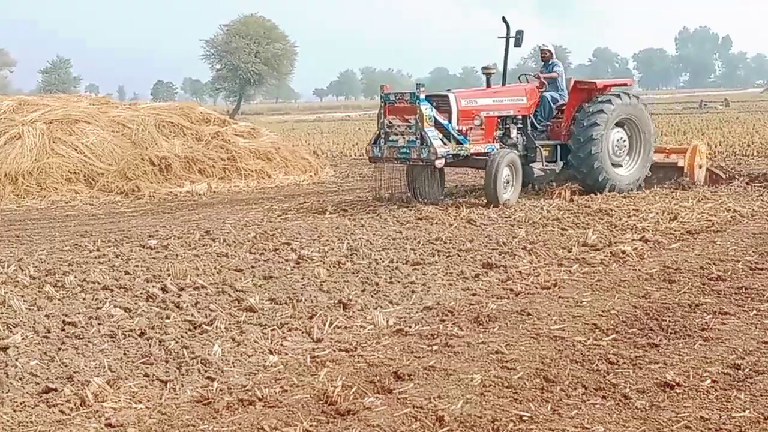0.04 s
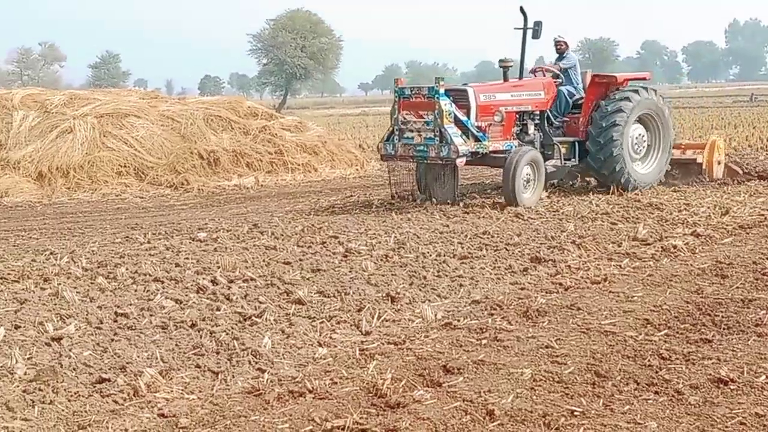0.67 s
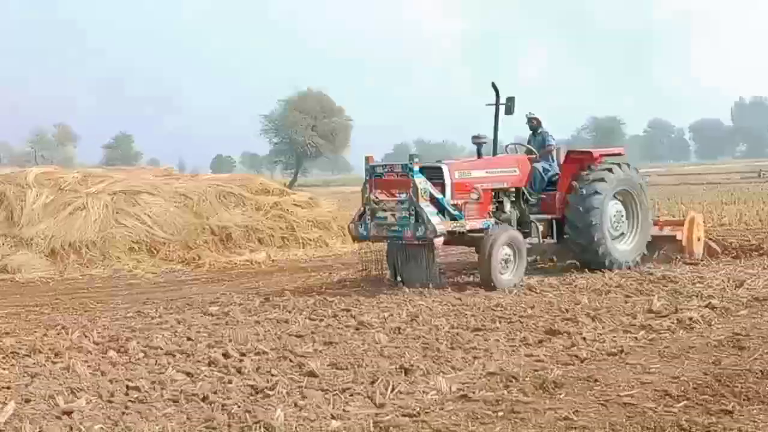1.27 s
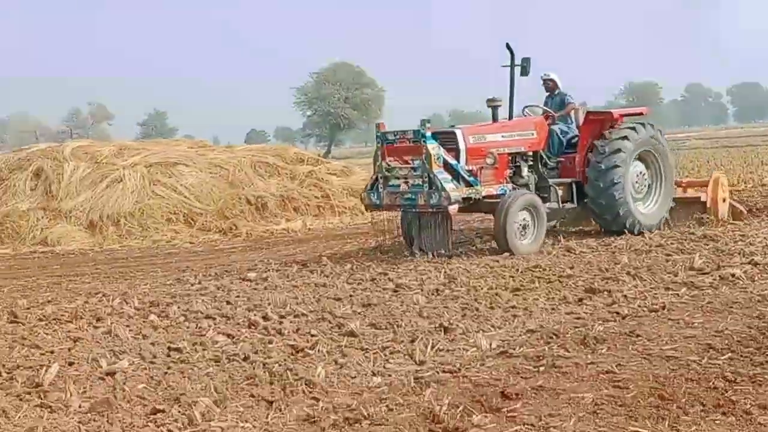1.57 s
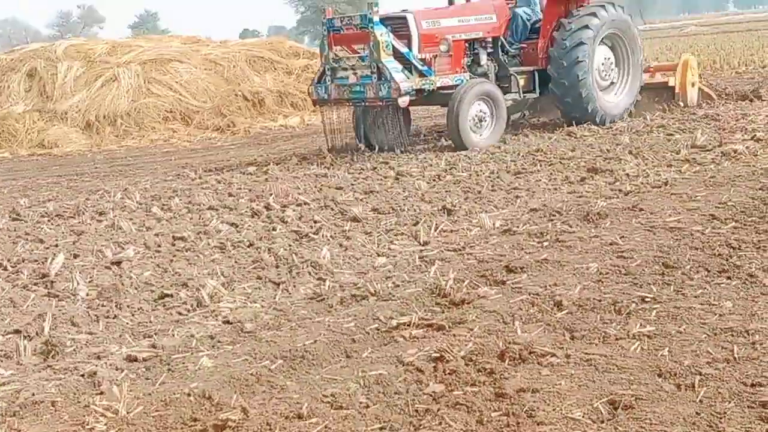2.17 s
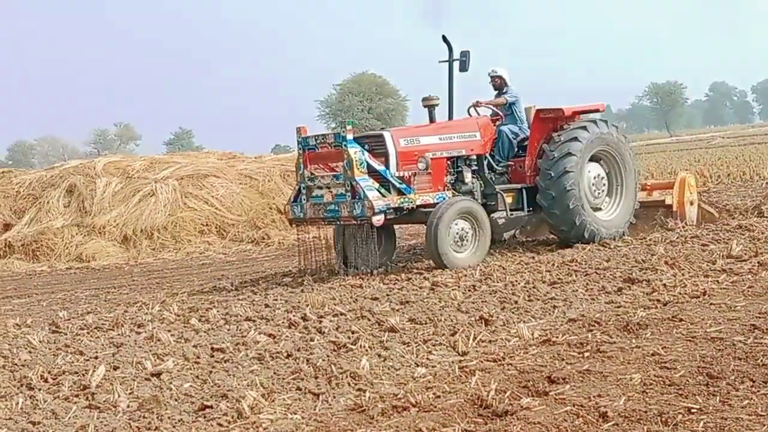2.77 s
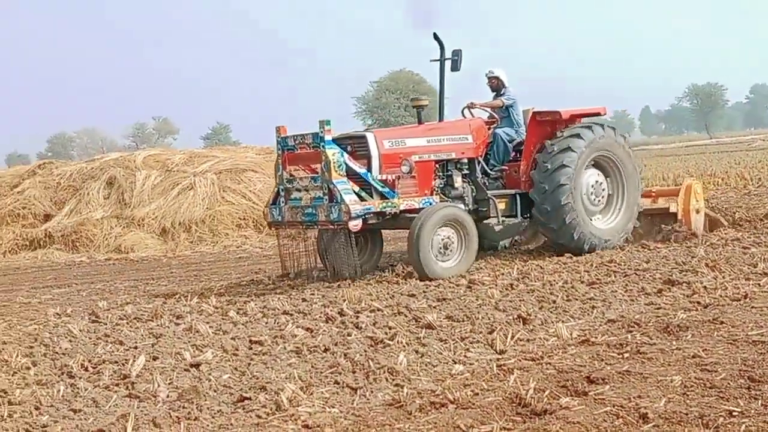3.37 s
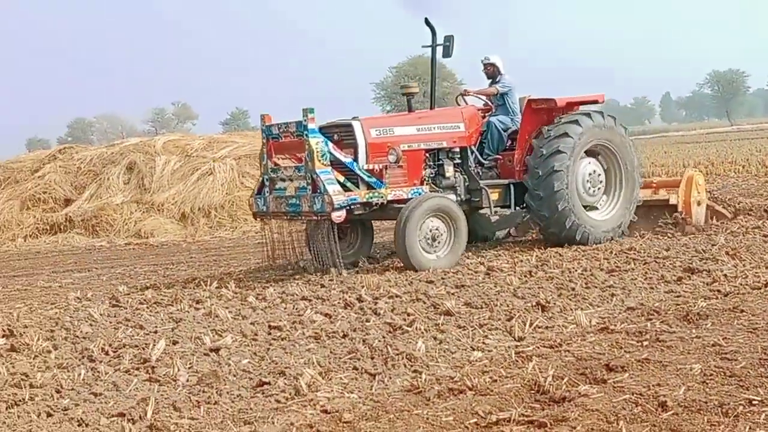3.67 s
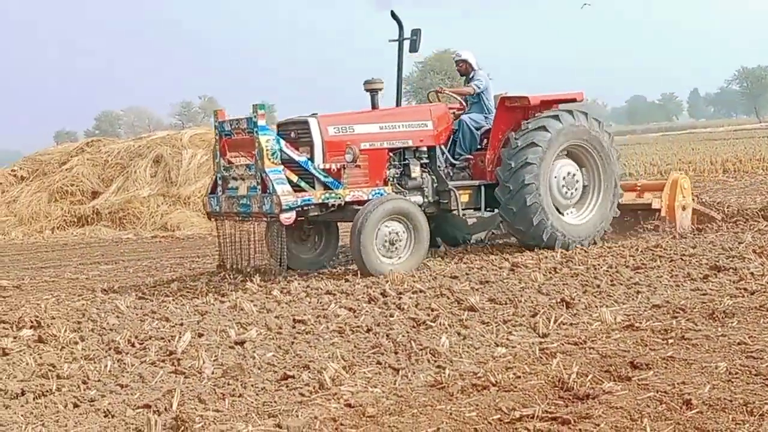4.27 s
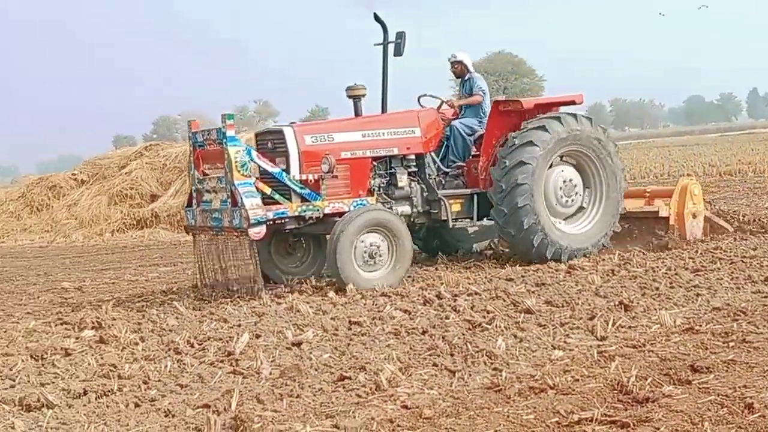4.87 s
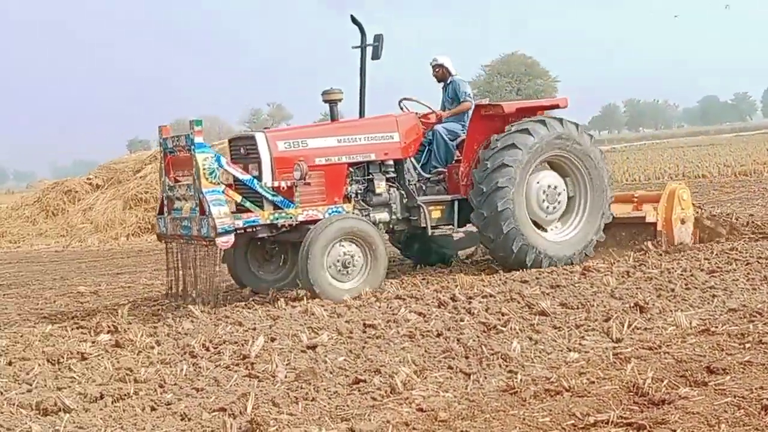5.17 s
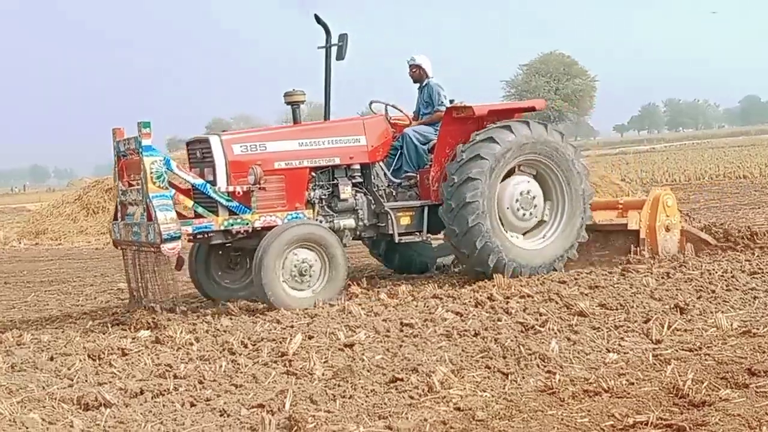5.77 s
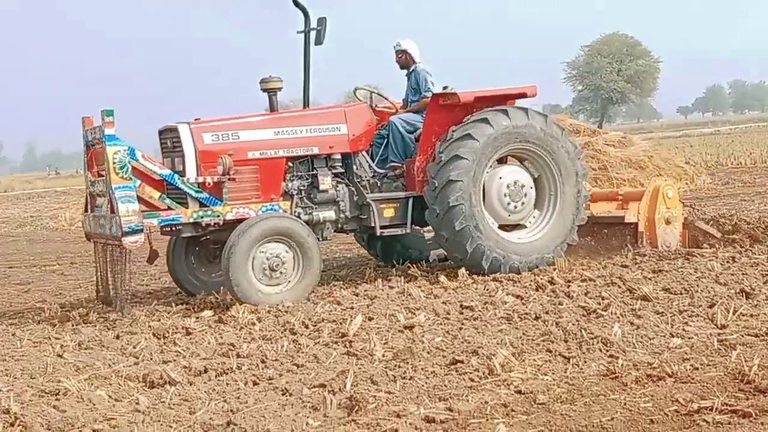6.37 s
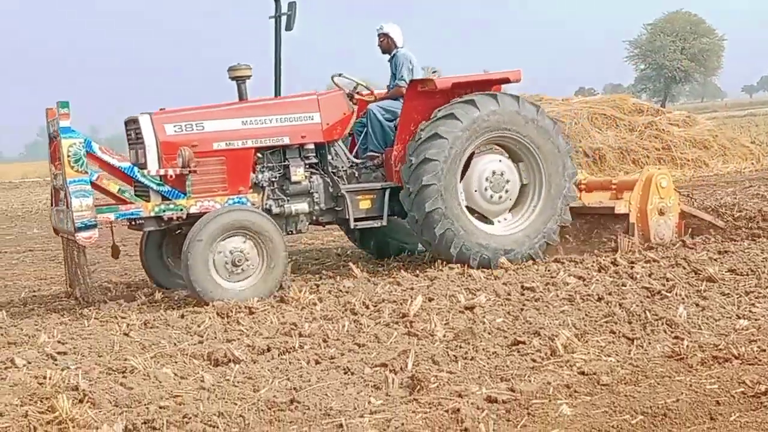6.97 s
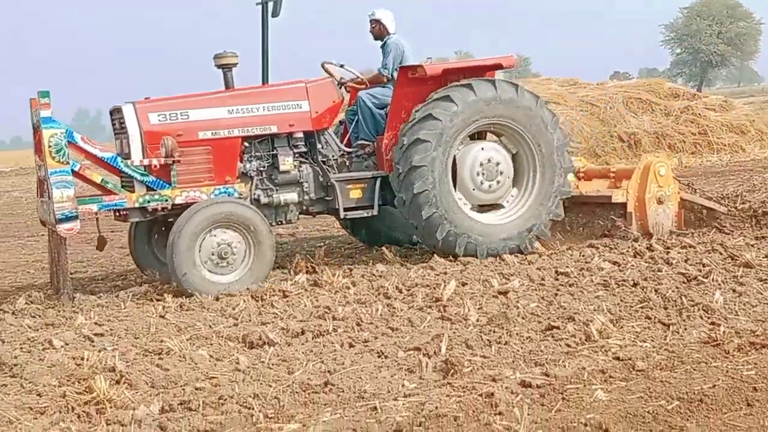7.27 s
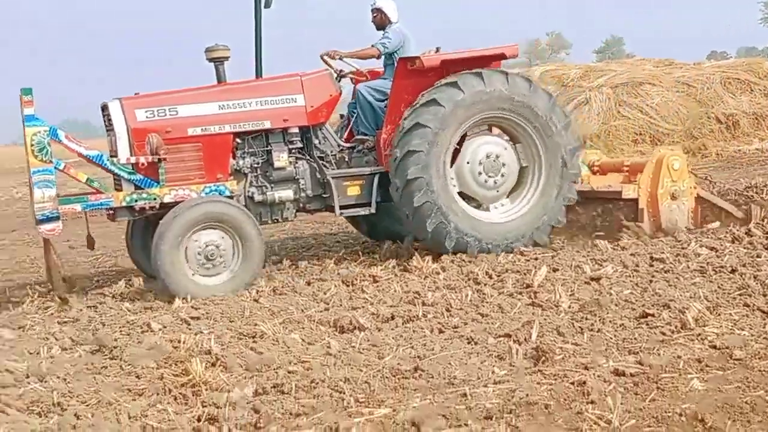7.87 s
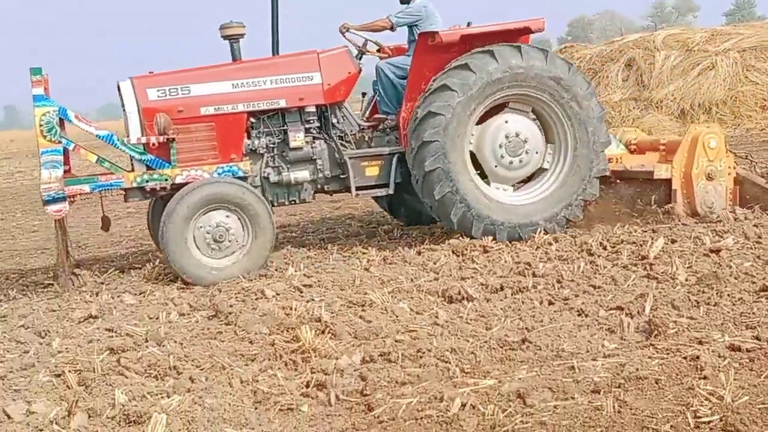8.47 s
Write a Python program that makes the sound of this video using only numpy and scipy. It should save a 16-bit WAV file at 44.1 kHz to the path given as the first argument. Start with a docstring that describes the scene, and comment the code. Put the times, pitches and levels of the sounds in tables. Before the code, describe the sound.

A diesel tractor pulls a rotary tiller across an open field for about eight and a half seconds, slowly nearing the microphone. From the start there is a continuous low exhaust drone with rapid knocking, clatter, fine metallic ticking and a light whirr; the pitch wavers slightly under load. Crumbling soil hisses softly underneath, swelling briefly between 1 and 2 seconds. Dry stalks crack at around 0.7, 1.3 and 2.1 seconds, and very faint, thin chain clinks occur between 2 and 5 seconds. Gear whine comes and goes, strongest from 5.5 to 6.6 seconds and again from 7.3 to 8.2. A vibrating metal panel adds a faint steady tone from about 1 second, clearest around 5, and returns near 7.3. The exhaust grows louder and fuller through the second half, and the engine is still running close by at the end.

```python
"""A four-cylinder diesel tractor pulls a rotary tiller over a dry field, nose on, then side on.
Exhaust drone, block knock, injector ticks and gear whine are locked to the crankshaft.
Soil hisses under the blades, stalks crack, a shaken panel howls and chain links clink.
The ground bounce hollows the sound; echoes off clods and wheels ripple the treble."""
import sys
import numpy as np
from scipy import signal
from scipy.fft import rfft, irfft, next_fast_len
from scipy.io import wavfile
from scipy.ndimage import uniform_filter1d, map_coordinates

SR = 44100
rng = np.random.default_rng(int(sys.argv[2]) if len(sys.argv) > 2 else 0)


def transcribe(u):
    """Save the signal u as a 16-bit wav file named by the first command-line argument.

    u: samples, shape (n,) or (channels, n), limited to [-1, 1]; the rate is SR.
    q: integer samples, one column per channel.
    """
    v = np.clip(np.atleast_2d(u).T, -1, 1)
    q = np.round(v * 32767).astype(np.int16)
    wavfile.write(sys.argv[1], SR, q)


N = 380583
T = np.arange(N) / SR
FFT_SIZE = next_fast_len(N + 8192)
BINS_HZ = np.fft.rfftfreq(FFT_SIZE, 1 / SR)

# engine speed, sagging with load: t/s, firing rate/Hz
FIRING_RATE = [(0.0, 47.69), (1.13, 47.61), (1.64, 48.41), (2.44, 47.43), (2.86, 48.12), (3.47, 46.18),
               (4.71, 47.18), (5.07, 48.45), (5.83, 46.27), (6.06, 47.01), (6.79, 46.32), (7.52, 48.24),
               (8.03, 48.49), (8.4, 46.69), (8.63, 45.19)]
# flank in view: t/s, share (0-1)
SIDE_ON = [(0, 0.11), (1.1, 0.08), (2.3, 0.5), (2.9, 0.79), (5.5, 1)]
# per part: level far and nose on/dB, gain side on/dB, gain when closest/dB
LEVELS = {"hum": (-31, 2.1, .3), "puffs": (-35.5, -2.95, 13.6), "knock": (-24.5, -2.88, 6.66),
          "clatter": (-26, 0.74, -1.17), "ticks": (-35.5, -2, -1.7), "soil": (-40.5, -5, 7.9),
          "dust": (-51.5, -13.5, 4.6), "whirr": (-27.5, -6, -1.7)}
# shaft-locked lines: multiple of firing rate, relative level/dB
EXHAUST_LINES = [(3, -1.5), (4, -3), (5, -1.5), (5.5, -7), (6, -5.5), (6.5, -1.5)]
WHIRR_LINES = [(19, -10.5), (20, -14.5)]
WHINE_LINES = [(13, -17), (16, 2), (24, -15.5), (32, -12), (34, -15.5)]
# source spectra: f/Hz, relative level/dB
PIPE_NOSE = [(52, -42), (68, -6), (90, -6), (135, 3), (175, -2), (235, -6), (320, 1.5), (400, 0), (520, -2),
             (700, -25), (1200, -61)]
PIPE_FLANK = [(52, -45), (68, -10.5), (90, -6), (135, -1), (195, -1.5), (250, 1), (320, -0.5), (420, -5),
              (520, -8), (700, -23), (1200, -64)]
BLOCK_NOSE = [(300, -15), (500, -12.5), (650, -1.5), (760, 1.5), (920, -1.5), (1150, 4), (1400, 0.5),
              (2000, -38), (4000, -80)]
BLOCK_FLANK = [(300, -40), (480, -3), (620, 0), (760, 5), (900, -1), (1020, -3.5), (1200, -5.5), (1500, -7),
               (2200, -60), (4000, -75)]
GEARS_NOSE = [(800, 5.5), (1300, -14.5), (1650, -2), (1900, -1), (2150, -7), (2400, -2), (2700, -5),
              (3050, -5), (3600, -10), (4300, -19.5), (7000, -56)]
GEARS_FLANK = [(800, -41), (1120, -3), (1350, -3.5), (1550, 3.5), (1750, 2), (2000, -1), (2200, -1),
               (2450, -6.5), (2800, -5.5), (3150, -8.5), (3420, -17.5), (7000, -44)]
INJECTORS = [(2000, -43), (3500, -13), (4400, -4.5), (5100, -15.5), (5800, -10.5), (6700, -3.5),
             (7500, -3.5), (8000, -9.5), (8600, -14.5), (9300, -41)]
COVER_TAPS = [(1200, -37), (1900, 10.5), (7800, -7), (9000, -29.5)]
SOIL_NOSE = [(1000, -18.5), (3400, -3), (4200, -1.5), (5100, -4), (6000, -10.5), (7000, -1), (8300, -6),
             (8800, -11), (9400, -41)]
SOIL_FLANK = [(1000, -11.5), (3300, -5.5), (3700, -0.5), (4250, -5), (5000, 1.5), (5400, -1), (5900, -2.5),
              (6500, 0), (7600, -1.5), (8200, -10), (8800, -14.5), (9400, -47)]
DUST_NOSE = [(6000, -8), (9000, -4), (11000, -6), (13000, 0), (14000, -6), (15500, -2)]
DUST_FLANK = [(6000, -14), (9000, 5.5), (9500, -5), (10900, 1.5), (11400, -3), (12500, -3.5), (13300, -12),
              (13900, -21), (15500, -21.5)]
AIR = [(10, -18), (35, -11), (62, 0), (120, -5)]
STRAW = [(3000, -25), (7000, 16), (9500, 3), (12500, 0), (15500, -8)]
# cover and fuel-pipe modes: f/Hz, width/Hz, relative level/dB
COVER_MODES = [(2128, 15, 8.5), (2625, 54, 0.5), (5140, 200, 0.5), (6850, 64, -12), (7050, 49, -5),
               (7570, 57, -12.5), (7880, 35, -3.5)]
# peak in the tick spectrum: t/s, f/Hz
TICK_PEAK = [(0, 8340), (1.1, 7700), (2.3, 7700), (2.8, 7100), (3.4, 6940), (4.0, 7700), (5.0, 7200),
             (8.63, 7230)]
# swells and dips of ticks and soil hiss: t/s, length/s, gain/dB
TICK_FLARES = [(.45, 1.4, 1), (1.8, 0.58, 4), (3.05, 0.15, 2.5), (3.35, 0.2, -2), (3.84, 0.3, 3.5),
               (7.4, .6, -3), (8.35, .2, 2)]
HISS_SWELLS = [(1.15, .6, 5.5), (2.5, 1, -3.5)]
# spells of gear whine and panel howl: t/s, length/s, level/dB
BLADE_BITES = [(.05, 0.84, -31), (1.05, 0.53, -26), (1.7, 1.12, -30.5), (4.5, 1.3, -30), (5.45, 1.19, -22),
               (7.25, 0.89, -20), (8.15, .45, -25)]
PANEL_HOWLS = [(1.1, 3.8, -32), (4.55, 0.92, -26.5), (7.25, 0.96, -31)]
# stalks cracking: t/s, level/dB
STALK_CRACKS = [(.615, -38), (.692, -29), (.706, -39), (1.305, -41), (2.11, -38)]
# chain links touching: t/s, level/dB, f/Hz
CLINKS = [(1.84, -45, 12400), (1.92, -46, 12550), (2.12, -53, 13000), (2.87, -53, 10180),
          (3.64, -53, 10000), (4.09, -54, 12600), (5.0, -55, 10040)]
# lowest ground-bounce dip: t/s, f/Hz
GROUND_DIP = [(0, 560), (1.1, 566), (1.5, 496), (2.3, 462), (3.4, 427), (8.63, 436)]
# bounce bands: multiple of dip nose on, same side on, width/Hz, gain nose on/dB, gain side on/dB
GROUND_BANDS = [(1.0, 1.0, 85, -15, -8.5), (2.3, 3.15, 130, -15.5, 1), (2.9, 3.75, 233, 7.5, 0.5),
                (4.7, 4.3, 120, -7.5, -8.5)]
# brief midrange hollows and crests: t/s, length/s, f/Hz, gain/dB
BRIEF_BANDS = [(1.25, 0.34, 1940, -11), (1.6, 0.55, 1960, 7.5), (1.65, 0.59, 1540, -6.5)]
# wandering treble crest: t/s, f/Hz, gain/dB
TREBLE_CREST = [(0, 3220, -1), (1.1, 3200, 2.5), (1.5, 3800, 7), (2.45, 3400, 7), (3.2, 2600, 4.5),
                (8.63, 2820, -1.6)]


def amp(db):
    """Decibels to gain."""
    return 10 ** (np.asarray(db) / 20)


def unit(x):
    """x at rms 1."""
    return x / np.sqrt(np.mean(x ** 2) + 1e-20)


def curves(rows):
    """Each column after the time, linearly interpolated."""
    times_s, *columns = np.transpose(rows)
    return [np.interp(T, times_s, column) for column in columns]


def wobble(rate_hz):
    """Smooth random curve, rate_hz knots a second."""
    return map_coordinates(rng.standard_normal(int(N * rate_hz / SR) + 4), [T * rate_hz])


def swell(start_s, length_s, attack_s, release_s):
    """Trapezoid envelope; the release begins after length_s."""
    age_s = T - start_s
    return np.clip(np.minimum(age_s / attack_s, 1 - (age_s - length_s) / release_s), 0, 1)


def singing(spells):
    """Gain of a tone that builds and dies in spells."""
    gains = [amp(db) * swell(s, length_s, attack_s=.11, release_s=.23) for s, length_s, db in spells]
    return np.max(gains, axis=0)


def fading(start_s, decay_s):
    """Sudden onset, exponential decay."""
    return (T > start_s) * np.exp(-np.abs(T - start_s) / decay_s)


def filtered(x, response):
    """x times a frequency response on BINS_HZ."""
    return irfft(rfft(x, FFT_SIZE) * response, FFT_SIZE)[..., :N]


def coloured(x, spectrum):
    """x through a spectrum, silent beyond its ends, at rms 1."""
    hz, db = np.transpose(spectrum)
    gain_db = np.interp(np.log(BINS_HZ + 1), np.log(hz), db, -np.inf, -np.inf)
    return unit(filtered(x, amp(gain_db)))


def resonated(x, modes):
    """x through ringing modes, at rms 1."""
    response = sum(amp(db) * 1j * BINS_HZ * width_hz / (hz ** 2 - BINS_HZ ** 2 + 1j * BINS_HZ * width_hz)
                   for hz, width_hz, db in modes)
    return unit(filtered(x, response))


def swept(x, centre_hz, width_hz, gain_db):
    """x through a moving peak or dip."""
    hz, frames_s, spectra = signal.stft(x, SR, nperseg=1024)
    framed = lambda curve: np.interp(frames_s, T, curve * np.ones(N))
    bell = 1 / (1 + ((hz[:, None] - framed(centre_hz)) / (width_hz / 2)) ** 2)
    return signal.istft(spectra * amp(framed(gain_db) * bell), SR, nperseg=1024)[1][:N]


def turning(nose, flank):
    """Crossfade from nose to flank as the tractor comes alongside."""
    return nose + (flank - nose) * curves(SIDE_ON)[0]


def radiated(x, nose, flank):
    """x coloured by the side in view."""
    return turning(coloured(x, nose), coloured(x, flank))


def level(part, closest_m=5.54, speed_m_per_s=.89, abreast_s=9.09):
    """Gain of a part from the side in view and its nearness on a straight pass."""
    nose_db, flank_db, near_db = LEVELS[part]
    along_m = speed_m_per_s * (T - abreast_s)
    nearness = closest_m ** 2 / (closest_m ** 2 + along_m ** 2)
    return amp(nose_db + turning(0, flank_db) + near_db * nearness)


def bursts(firings, rise_s, decay_s, sustain, repeat_share, uneven_db, scatter_db):
    """One noise burst per firing; each cylinder repeats a share of its own noise."""
    stroke = firings.astype(int)
    starts_s = np.interp(np.arange(stroke[-1] + 1), firings, T)
    age_s = T - starts_s[stroke]
    cylinder = stroke % 4
    repeated = rng.standard_normal((4, SR // 20))[cylinder, (age_s * SR).astype(int)]
    noise = np.sqrt(repeat_share) * repeated + np.sqrt(1 - repeat_share) * rng.standard_normal(N)
    cylinder_db = uneven_db * np.array([1, -1, .5, -.5])[cylinder]
    stroke_db = scatter_db * rng.standard_normal(1000)[stroke]
    envelope = (1 - np.exp(-age_s / rise_s)) ** 2 * np.exp(-age_s / decay_s)
    return noise * (unit(envelope * amp(cylinder_db + stroke_db)) + sustain)


def tones(cycles, lines, drift_rad, flutter_db):
    """Lines at multiples of a cycle count, shaken in phase and level, at rms 1."""
    total = np.zeros(N)
    for multiple, db in lines:
        gain = amp(db + flutter_db * wobble(40))
        jitter_rad = drift_rad * (wobble(9) + .54 * wobble(60))
        total += gain * np.cos(2 * np.pi * multiple * cycles + jitter_rad)
    return unit(total)


def exhaust(firings):
    """Drone at the firing rate and its octave, under ragged puffs from the stack."""
    phase_rad = 2 * np.pi * firings
    octave = amp(1.1 * wobble(12)) * np.sin(2 * phase_rad)
    fundamental = amp(-11.5 + 1.3 * wobble(6)) * np.sin(phase_rad)
    puffs = bursts(firings, rise_s=.00098, decay_s=.0076, sustain=1.3,
                   repeat_share=.34, uneven_db=.5, scatter_db=1)
    overtones = amp(-9.5) * tones(firings, EXHAUST_LINES, drift_rad=.25, flutter_db=1.5)
    stack = radiated(puffs, PIPE_NOSE, PIPE_FLANK) + overtones
    return level("hum") * unit(fundamental + octave) + level("puffs") * stack


def engine(firings):
    """Combustion knocks the block and rattles the gears."""
    knock = bursts(firings, rise_s=.002, decay_s=.012, sustain=2.5,
                   repeat_share=.18, uneven_db=1, scatter_db=1.3)
    clatter = bursts(firings, rise_s=.0045, decay_s=.0065, sustain=1.5,
                     repeat_share=.15, uneven_db=1.2, scatter_db=1.3)
    block = amp(.5 * wobble(8)) * radiated(knock, BLOCK_NOSE, BLOCK_FLANK)
    gears = amp(.35 * wobble(6)) * radiated(clatter, GEARS_NOSE, GEARS_FLANK)
    return level("knock") * block + level("clatter") * gears


def injectors(firings):
    """A metallic tick just after each knock begins; the covers ring with it."""
    injections = firings + .88  # lags by 0.12 of a firing
    flare_db = sum(db * swell(s, length_s, attack_s=.073, release_s=.15)
                   for s, length_s, db in TICK_FLARES)
    ticks = bursts(injections, rise_s=.0033, decay_s=.0036, sustain=.63,
                   repeat_share=.068, uneven_db=.1, scatter_db=3.6)
    bright = unit(swept(coloured(ticks, INJECTORS), curves(TICK_PEAK)[0], width_hz=950, gain_db=13))
    taps = bursts(injections, rise_s=.001, decay_s=.0053, sustain=.11,
                  repeat_share=.058, uneven_db=3.8, scatter_db=1.5)
    covers = resonated(coloured(taps, COVER_TAPS), COVER_MODES)
    return level("ticks") * amp(.45 * wobble(5.1)) * (amp(flare_db - .55) * bright + amp(-3) * covers)


def whirr(firings):
    """Shaft-locked whirr from the nose."""
    return level("whirr") * tones(firings, WHIRR_LINES, drift_rad=.57, flutter_db=4)


def tiller():
    """Soil crumbles under the blades; fine dust hisses above it."""
    swell_db = sum(db * swell(s, length_s, attack_s=.26, release_s=.63)
                   for s, length_s, db in HISS_SWELLS)
    crumbs = lambda: rng.standard_normal(N) * amp(2 * wobble(300))
    soil = amp(swell_db) * radiated(crumbs(), SOIL_NOSE, SOIL_FLANK)
    dust = amp(.46 * swell_db + 1.1 * wobble(12)) * radiated(crumbs(), DUST_NOSE, DUST_FLANK)
    return level("soil") * soil + level("dust") * dust


def air():
    """Faint rumble of air moving over the field."""
    return amp(-53) * coloured(rng.standard_normal(N), AIR)


def gear_whine(firings):
    """The gears sing as the blades bite; backlash shakes the lines."""
    return singing(BLADE_BITES) * tones(firings, WHINE_LINES, drift_rad=.51, flutter_db=2.5)


def stalks():
    """Dry stalks crack in short, bright bursts."""
    envelope = sum(amp(db) * fading(s, decay_s=.011) for s, db in STALK_CRACKS)
    return envelope * coloured(rng.standard_normal(N), STRAW)


def panel_howl(pitch_hz=671):
    """A shaken sheet-metal panel howls at its own pitch."""
    return singing(PANEL_HOWLS) * tones(pitch_hz * T, [(1, 0)], drift_rad=.5, flutter_db=2.5)


def chains():
    """Loose links on the front guard touch and ring, high and thin."""
    shimmer_rad = 1.5 * wobble(300)
    return sum(amp(db) * fading(s, decay_s=.025) * np.sin(2 * np.pi * hz * T + shimmer_rad)
               for s, db, hz in CLINKS)


def ground_bounce(sound):
    """Direct and reflected sound cancel and add in bands that slide together."""
    dip_hz = curves(GROUND_DIP)[0]
    for nose, flank, width_hz, nose_db, flank_db in GROUND_BANDS:
        sound = swept(sound, dip_hz * turning(nose, flank), width_hz, turning(nose_db, flank_db))
    return sound


def shifting_colour(sound):
    """Brief hollows and crests in the midrange; one crest wanders in the treble."""
    for s, length_s, hz, db in BRIEF_BANDS:
        envelope = swell(s, length_s, attack_s=.14, release_s=.2)
        sound = swept(sound, hz, width_hz=210, gain_db=db * envelope)
    crest_hz, crest_db = curves(TREBLE_CREST)
    return swept(sound, crest_hz, width_hz=560, gain_db=crest_db)


def scattered(sound, ripple_db):
    """Echoes off clods and wheels ripple the treble; the pattern drifts as the tractor rolls."""
    hz, _, spectra = signal.stft(sound, SR, nperseg=1024)
    ripple = uniform_filter1d(rng.standard_normal(spectra.shape), size=3, axis=0)
    for frames in (60, 30):
        ripple = uniform_filter1d(ripple, size=frames, axis=1)
    treble_share = np.clip((hz[:, None] - 900) / 2500, 0, 1)
    return signal.istft(spectra * amp(ripple_db * treble_share * unit(ripple)), SR, nperseg=1024)[1][:N]


def scene(first_firing_s=.015):
    """Tractor and tiller through moving reflections, over the air rumble; mono."""
    rate_hz = curves(FIRING_RATE)[0]
    firings = 1 + np.cumsum(rate_hz) / SR - first_firing_s * rate_hz[0]  # running count
    sound = exhaust(firings) + engine(firings) + injectors(firings)
    sound += gear_whine(firings) + panel_howl() + whirr(firings)
    sound += tiller() + stalks() + chains()
    sound = shifting_colour(ground_bounce(sound))
    return (scattered(sound, ripple_db=1.8) + air())[None]


def record(dry, cutoff_hz=15600):
    """Brick-wall low-pass."""
    return filtered(dry, BINS_HZ < cutoff_hz)


dry = scene()
out = record(dry)
transcribe(out)
```